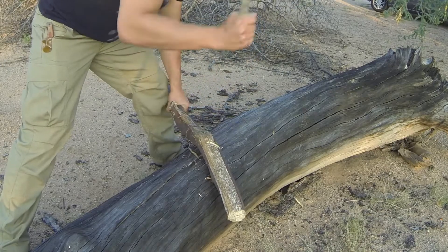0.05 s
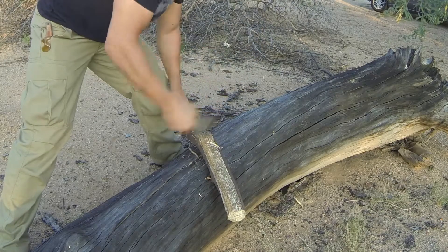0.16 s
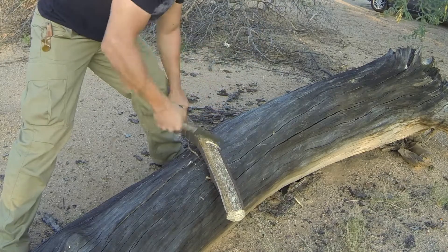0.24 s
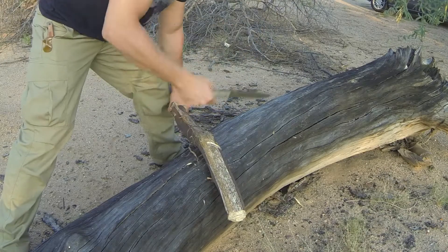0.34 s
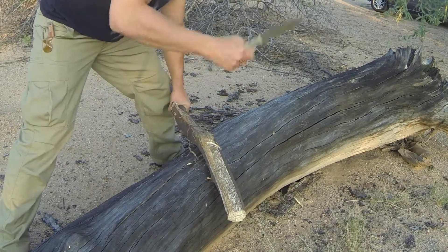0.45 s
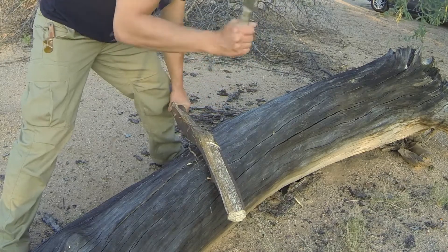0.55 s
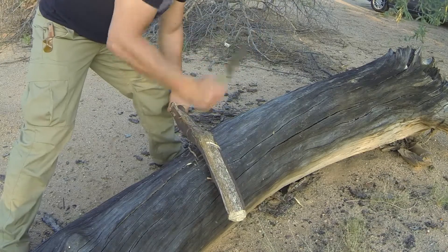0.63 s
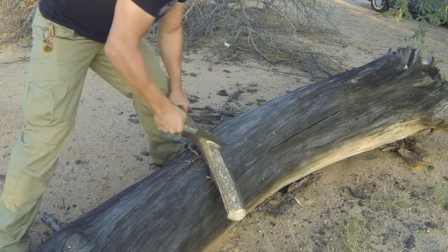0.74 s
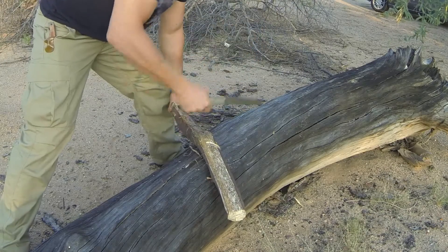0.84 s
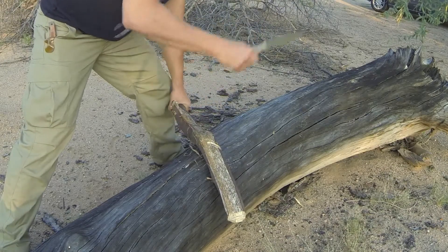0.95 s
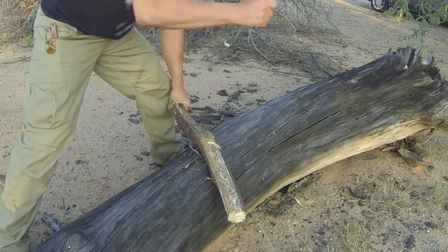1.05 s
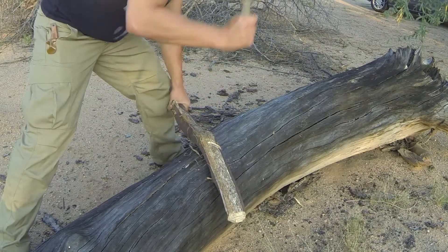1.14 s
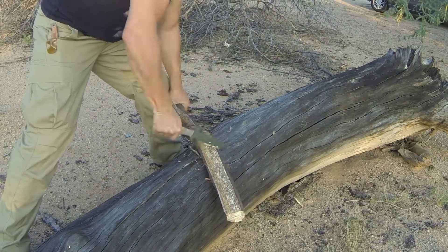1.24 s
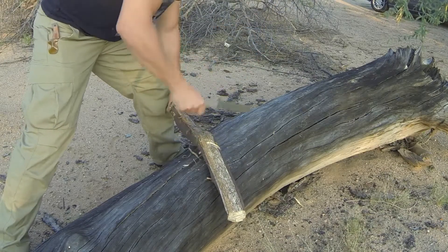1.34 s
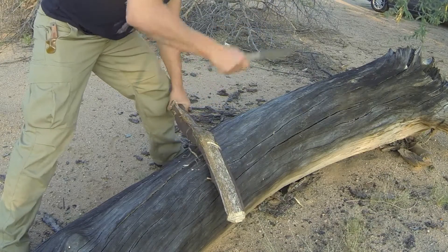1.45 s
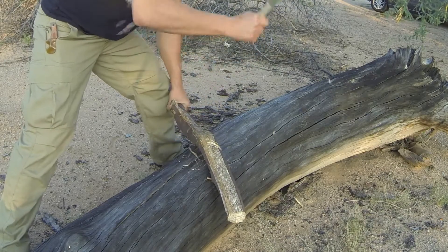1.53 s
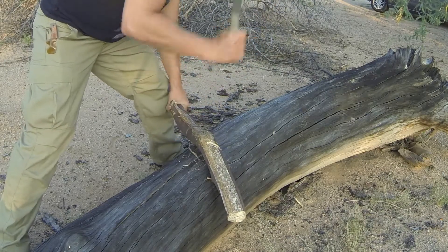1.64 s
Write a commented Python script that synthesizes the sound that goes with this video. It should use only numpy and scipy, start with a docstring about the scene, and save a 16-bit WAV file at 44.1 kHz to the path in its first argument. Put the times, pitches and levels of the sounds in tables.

```python
"""Three heavy-knife chops into a hard branch lying across a log, outdoors: noise bursts and struck modes.
Each is a bright bite of the edge, a crunch of fibres, a thud into the log and a short woody ring.
The branch knocks back with log modes and a bark tick; a chip ticks once as a noise burst.
Ground and brush scatter noise in decaying bands; each chop returns as two smeared far echoes.
Behind lie coloured-noise air, a low hum of narrow noise bands and a distant whir that swells once."""
import sys
import numpy as np
from scipy import signal
from scipy.fft import rfft, irfft
from scipy.io import wavfile
from scipy.ndimage import uniform_filter1d, minimum_filter1d

SR = 44100
rng = np.random.default_rng(int(sys.argv[2]) if len(sys.argv) > 2 else 0)


def master(y):
    """Save y as 16-bit WAV."""
    cut = np.clip(np.atleast_2d(y).T, -1, 1)
    pcm = np.round(cut * 32767)  # scale
    wavfile.write(sys.argv[1], SR, pcm.astype(np.int16))


N = 74970
T = np.arange(N) / SR
HZ = np.fft.rfftfreq(N, 1 / SR)

# Blows: (time [s], ring [dB], ring tilt [dB/octave], ring length [factor], place along branch [0-1],
#  pitch [factor], bite [dB], bite tilt [dB/octave], crunch [dB], thud [dB], scatter length [factor],
#  echo delay [s], echo level [dB])
CHOPS = [(0.2008, 2, 1.1, 1.05, .09, 1.001, -2.5, 1.5, -0.5, 0, 0.68, 0.18, -41.5),
         (0.7194, 1, -3.5, 0.82, .202, 0.98, 2, 6.5, -2, 1.5, 0.76, .172, -40),
         (1.254, 2.5, -0.5, 0.73, .266, .998, -2, -12.5, -3, -2, 0.62, .165, -39)]
# Branch knocking back on the log: (time [s], low knock [dB], tick [dB])
REBOUNDS = [(.277, -16.5, -40.5), (0.785, -10.5, -52), (0.81, -19, -65), (1.289, -15, -44.5),
            (1.319, -18, -41)]
# Branch with the blade in it: (frequency [Hz], level [dB], t60 before length factor [s])
BRANCH_MODES = [(195, -31, 0.081), (406, -19.5, .075), (486, -26, 0.11), (678.7, -21.5, 0.12),
                (841, -17, .075), (937, -29.5, 0.067), (1106, -18.5, 0.069), (1403, -23, 0.12),
                (1473, -21, .048), (1574.6, -22, 0.053), (1863, -19.5, 0.069), (2085, -38, 0.055),
                (2415.5, -13.5, 0.056), (2986, -24, .036)]
# Quickly damped notes of the entering edge: (frequency [Hz], level [dB], t60 [s])
EDGE_MODES = [(3165, -17.5, .014), (3962, -10, 0.01), (5294, -15, .014), (6370, -18.5, 0.011),
              (8335, -25, 0.003)]
# Dull modes of the log: (frequency [Hz], level [dB], t60 [s])
LOG_MODES = [(86.4, -31.5, .2), (131, -21, 0.097), (178, -16.5, 0.049), (275.4, -16.5, 0.022)]
# Spectral shapes, relative density: (frequency [Hz], level [dB])
# Edge cutting in
BITE_SPECTRUM = [(500, -17.5), (2700, -10.5), (3600, 5.5), (4500, -2), (5500, -6), (8500, -10),
                 (10500, -25), (13000, -35.5), (16000, -42)]
# Fibres crushing, before tilt
CRUNCH_SPECTRUM = [(40, -34), (100, -10.5), (260, -6), (350, -12.5), (560, -8.5), (820, 6), (1000, -5),
                   (1750, 1), (2100, -16), (2450, -3.5), (2750, -24), (6000, -35.5), (12000, -63.5)]
# Return from ground and brush
SCATTER_SPECTRUM = [(50, -20), (90, 3.5), (200, 13.5), (400, 8), (1000, 2), (2200, -8), (4000, -9),
                    (8000, -22), (10500, -31.5), (12000, -41), (16000, -60)]
# Far reflection
ECHO_SPECTRUM = [(100, -8), (400, 5.5), (800, -0.5), (2000, -1), (3500, -2), (6000, -11), (10000, -7.5)]
# Tick of a chip
CHIP_SPECTRUM = [(1000, -25), (4000, -22), (7000, -4), (8000, 10), (9000, -5), (11500, 2), (13000, -20),
                 (16000, -28)]
# Tick of bark on the log
BARK_SPECTRUM = [(200, 18), (1000, 12.5), (4000, 6), (10000, -42), (14000, -48)]
# Open air
AIR_SPECTRUM = [(15, -24.5), (25, -2), (123, -9.5), (200, -14.5), (277, -15), (309, -21), (335, -19),
                (489, -20.5), (714, -19.5), (1400, -29), (2350, -33), (6050, -41.5), (8140, -45),
                (12500, -53.5), (16000, -68.5)]
# Distant whir
WHIR_SPECTRUM = [(300, -30), (700, -9.5), (900, 0.5), (1030, 4.5), (1250, -7), (1700, -23), (4000, -25),
                 (8000, -28), (12000, -36.5), (16000, -45)]
# Scatter decay before length factor: (frequency [Hz], t60 [s])
SCATTER_T60 = [(80, 0.92), (200, 0.27), (600, 0.24), (2000, 0.33), (5000, 0.27), (11000, 0.47)]
# Low hum bands: (frequency [Hz], level [dB])
HUM_BANDS = [(62, -62), (122, -61.5), (158, -66.5)]
# Swell of the whir: (time [s], level [dB])
WHIR_LEVEL = [(0, -68.5), (.7, -73.5), (.95, -61.5), (1.15, -56.5), (1.24, -58), (1.4, -67.5), (1.7, -65.5)]

AIR_DB, HUM_WIDTH_HZ = -54, 3.5
SCATTER_DB, SCATTER_RISE_S = -29, 0.006
SCATTER_LUMP_DB, SCATTER_LUMP_HZ = 3, 120  # single twigs and stones stand out
ECHO_RISE_S, ECHO_HOLD_S, ECHO_T60_S = 0.00067, 0.0022, 0.064
FAR_LAG_S, FAR_DB = 0.035, -9.5  # second, farther reflector, relative to the first
CHIP_S, CHIP_DB = 0.391, -57
BITE_DB, BITE_RISE_S, BITE_HOLD_S, BITE_T60_S = -14.5, 0.00089, 0.00061, 0.016
EDGE_PIVOT_HZ = 4820
CRUNCH_DB, CRUNCH_RISE_S, CRUNCH_HOLD_S, CRUNCH_T60_S = -9, 0.0013, 0.0035, 0.012
CRUNCH_PIVOT_HZ = 604  # above this the crunch tilts with the ring
SINK_S, RING_RISE_S = 0.0005, 0.0013  # the blade sinks in before the wood moves
PLACE_DB = 4  # how much the place of the blow favours some modes over others
CEILING, BAND_LIMIT_HZ = 1.0, 16100


def amp(db):
    """Decibels to gain."""
    return 10 ** (np.asarray(db) / 20)


def unit(x):
    """Scales to rms 1."""
    return x / np.sqrt(np.mean(x ** 2) + 1e-20)


def read(points, hz):
    """Interpolates a table on a log-frequency axis."""
    table_hz, value = np.transpose(points)
    return np.interp(np.log(hz + 1), np.log(table_hz + 1), value)


def add(mix, time_s, sound):
    """Mixes a sound in at time_s, cut at the end of the mix."""
    part = mix[max(round(time_s * SR), 0):]
    part += sound[:len(part)]


def fade(t_s, t60_s):
    """Exponential decay, 60 dB in t60_s."""
    return np.exp(-np.log(1000) * t_s / t60_s)


def noise(gain):
    """Noise of rms 1, shaped by a gain per frequency."""
    return unit(irfft(rfft(rng.standard_normal(N)) * gain, N))


def coloured_noise(spectrum):
    """Noise of rms 1 with a tabled spectrum."""
    return noise(amp(read(spectrum, HZ)))


def band(hz, width_hz):
    """Noise of rms 1 in one steep resonance."""
    return noise(1 / (1 + ((HZ - hz) / width_hz) ** 2) ** 2)


def burst(spectrum, rise_s, hold_s, t60_s):
    """Coloured noise with attack, hold and decay; energy set by the envelope alone."""
    envelope = np.minimum(T / rise_s, 1) * fade(np.maximum(T - hold_s, 0), t60_s)
    envelope_rms = np.sqrt(np.mean(envelope ** 2))
    return unit(coloured_noise(spectrum) * envelope) * envelope_rms


def ring(modes, tilt_db=0, length=1, place=0, pitch=1, place_db=0, pivot_hz=1000):
    """Decaying sine modes of alternating sign, tilted about a pivot and weighted by place of blow."""
    out = np.zeros(N)
    for k, (hz, db, t60_s) in enumerate(modes):
        tilt = tilt_db * np.log2(hz / pivot_hz)
        place_weight = place_db * np.cos(2 * np.pi * place * (k + 1))
        mode = fade(T, t60_s * length) * np.sin(2 * np.pi * hz * pitch * T)
        out += (-1) ** k * amp(db + tilt + place_weight) * mode
    return out


def air():
    """Open air: steady coloured noise."""
    return amp(AIR_DB) * coloured_noise(AIR_SPECTRUM)


def hum():
    """Low hum: narrow noise bands, which waver by themselves."""
    return sum(amp(db) * band(hz, HUM_WIDTH_HZ) for hz, db in HUM_BANDS)


def whir():
    """Distant whir: coloured noise under a slow level curve."""
    level_db = np.interp(T, *np.transpose(WHIR_LEVEL))
    return amp(level_db) * coloured_noise(WHIR_SPECTRUM)


def scatter(length):
    """Lumpy return from ground and brush, each band dying at its own speed."""
    hz, t_s, bands = signal.stft(coloured_noise(SCATTER_SPECTRUM), SR, nperseg=256)
    t60_s = length * read(SCATTER_T60, hz)[:, None]
    tail = signal.istft(bands * fade(t_s, t60_s), SR)[1][:N]
    lumps_db = SCATTER_LUMP_DB * band(0, SCATTER_LUMP_HZ)
    return amp(SCATTER_DB + lumps_db) * np.minimum(T / SCATTER_RISE_S, 1) * tail


def reflect(x):
    """Smears a sound over many small reflections: convolution with a unit-energy noise burst."""
    path = burst(ECHO_SPECTRUM, ECHO_RISE_S, ECHO_HOLD_S, ECHO_T60_S)
    return signal.fftconvolve(x, path / np.linalg.norm(path))[:N]


def echo(x):
    """Two smeared returns from far off, the second later and weaker."""
    out = reflect(x)
    add(out, FAR_LAG_S, amp(FAR_DB) * reflect(x))
    return out


def chip():
    """Tick of a falling chip: short bright noise burst."""
    return amp(CHIP_DB) * burst(CHIP_SPECTRUM, rise_s=0.00046, hold_s=0.0013, t60_s=0.021)


def rebound(knock_db, tick_db):
    """Branch drops back: log modes plus a noise tick of bark."""
    tick = burst(BARK_SPECTRUM, rise_s=0.0028, hold_s=0.0017, t60_s=0.023)
    return amp(knock_db) * ring(LOG_MODES) + amp(tick_db) * tick


def bite(level_db, tilt_db):
    """Edge enters: quickly damped high modes plus a cutting noise burst."""
    edge = ring(EDGE_MODES, tilt_db, pivot_hz=EDGE_PIVOT_HZ) * np.minimum(T / BITE_RISE_S, 1)
    cut = amp(BITE_DB) * burst(BITE_SPECTRUM, BITE_RISE_S, BITE_HOLD_S, BITE_T60_S)
    return amp(level_db) * (edge + cut)


def crunch(level_db, tilt_db):
    """Fibres crush: short noise burst, tilted above the pivot."""
    spectrum = [(hz, db + tilt_db * max(np.log2(hz / CRUNCH_PIVOT_HZ), 0)) for hz, db in CRUNCH_SPECTRUM]
    return amp(CRUNCH_DB + level_db) * burst(spectrum, CRUNCH_RISE_S, CRUNCH_HOLD_S, CRUNCH_T60_S)


def chop(ring_db, tilt_db, length, place, pitch, bite_db, bite_tilt_db, crunch_db, thud_db):
    """Edge bites; SINK_S later fibres crush and the struck branch and log ring."""
    branch = amp(ring_db) * ring(BRANCH_MODES, tilt_db, length, place, pitch, PLACE_DB)
    thud = amp(thud_db) * ring(LOG_MODES)
    wood = (branch + thud) * np.minimum(T / RING_RISE_S, 1)
    out = bite(bite_db, bite_tilt_db)
    add(out, SINK_S, crunch(crunch_db, tilt_db) + wood)
    return out


def scene():
    """Chops with scatter and echoes, rebounds and a chip over the background."""
    mix = air() + hum() + whir()
    for time_s, *blow, scatter_length, echo_delay_s, echo_db in CHOPS:
        sound = chop(*blow)
        add(mix, time_s, sound + scatter(scatter_length))
        add(mix, time_s + echo_delay_s, amp(echo_db) * echo(sound))
    for time_s, knock_db, tick_db in REBOUNDS:
        add(mix, time_s, rebound(knock_db, tick_db))
    add(mix, CHIP_S, chip())
    return mix[None]


def record(dry):
    """Fast limiter: smoothed minimum of the allowed gain; then a linear-phase low-pass."""
    allowed_gain = np.minimum(CEILING / (abs(dry) + 1e-9), 1)
    limiter_gain = uniform_filter1d(minimum_filter1d(allowed_gain, size=45), size=23)
    low_pass = signal.firwin(511, BAND_LIMIT_HZ, window=("kaiser", 9), fs=SR)
    return signal.oaconvolve(dry * limiter_gain, low_pass[None], "same")


dry = scene()
out = record(dry)
master(out)
```